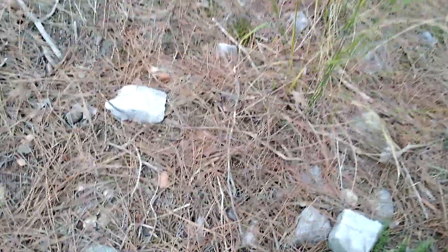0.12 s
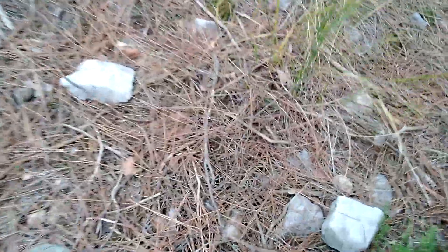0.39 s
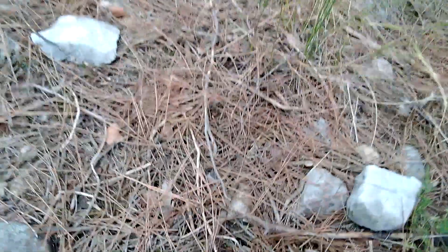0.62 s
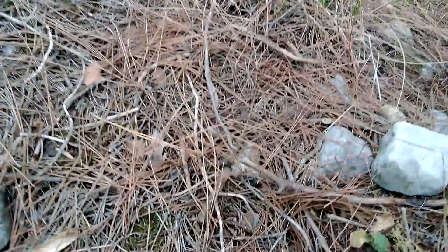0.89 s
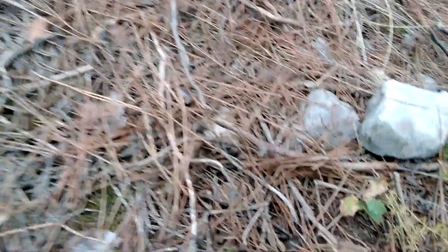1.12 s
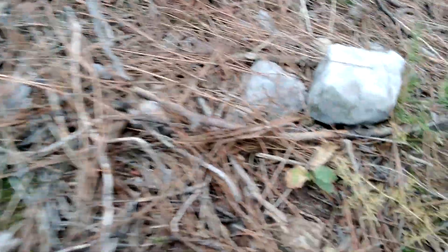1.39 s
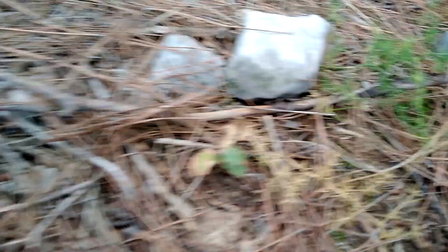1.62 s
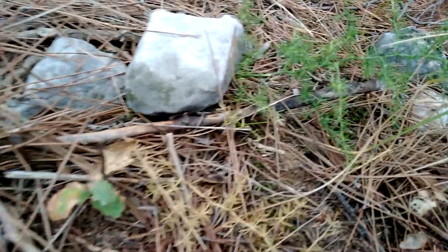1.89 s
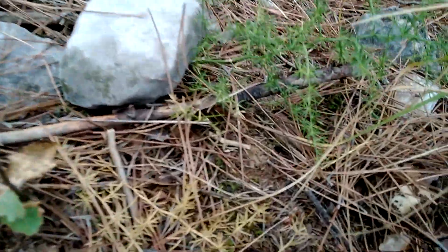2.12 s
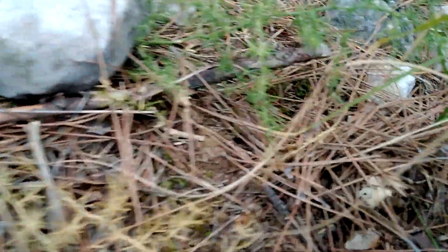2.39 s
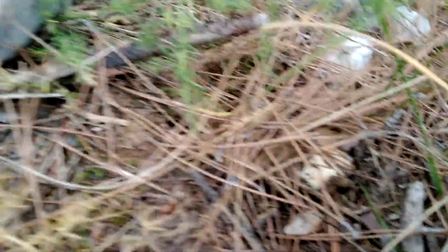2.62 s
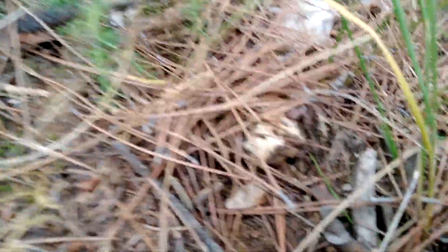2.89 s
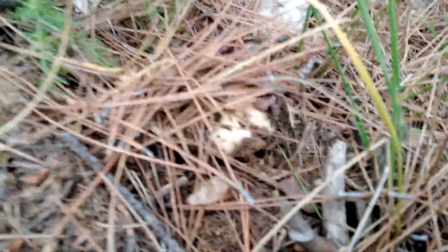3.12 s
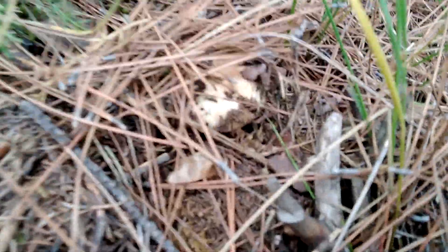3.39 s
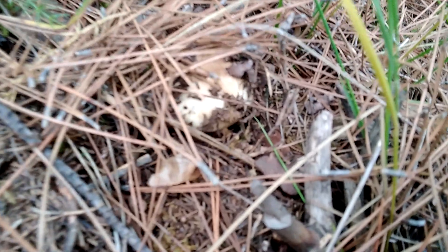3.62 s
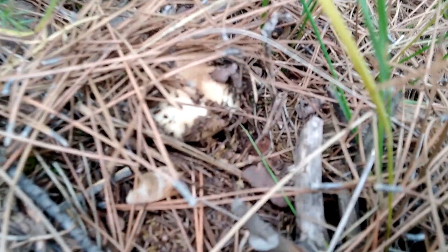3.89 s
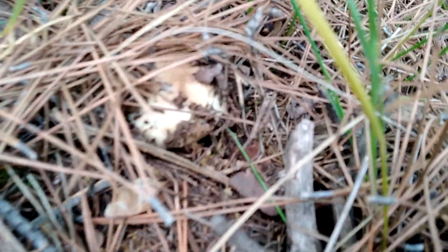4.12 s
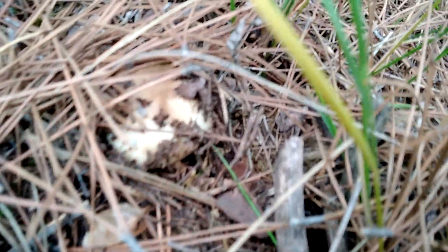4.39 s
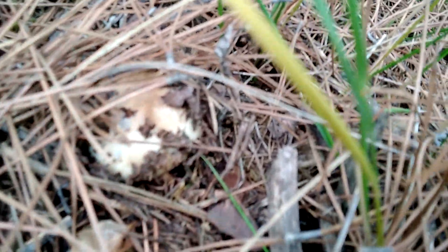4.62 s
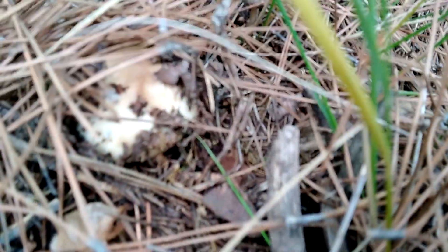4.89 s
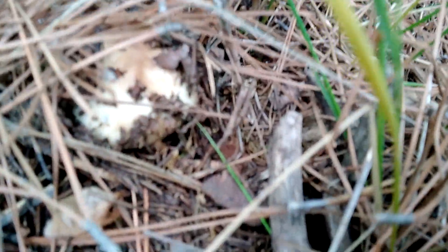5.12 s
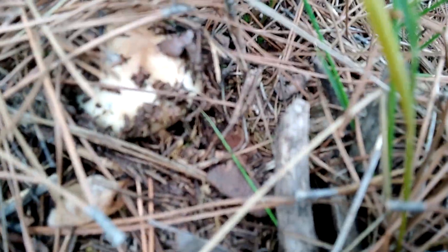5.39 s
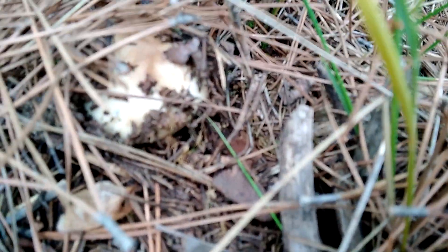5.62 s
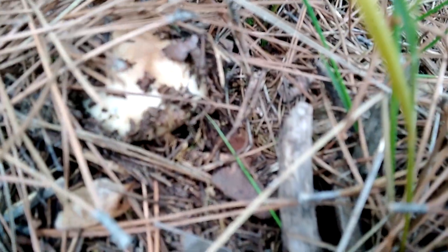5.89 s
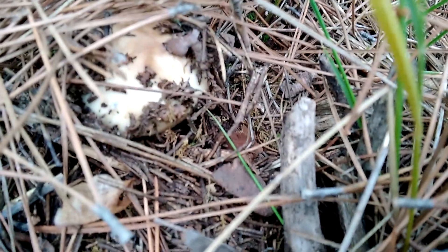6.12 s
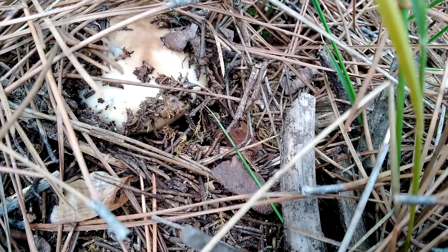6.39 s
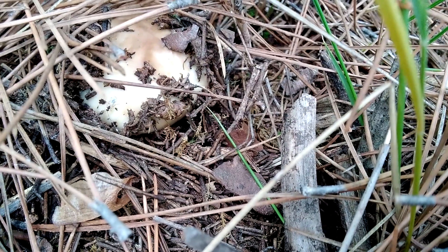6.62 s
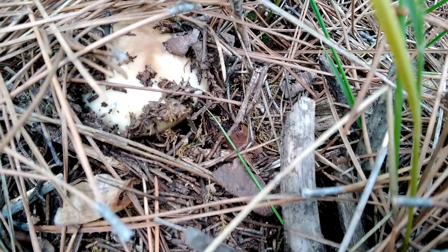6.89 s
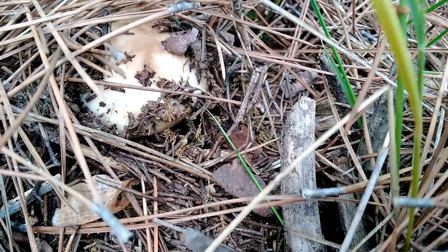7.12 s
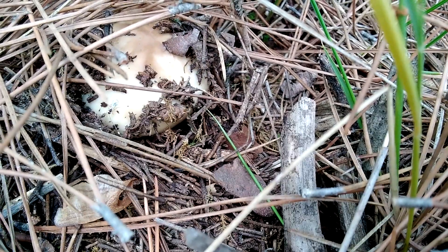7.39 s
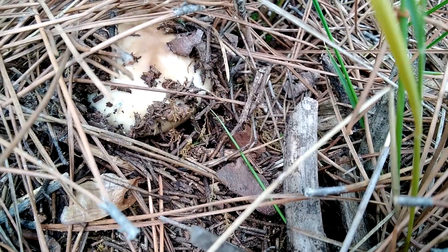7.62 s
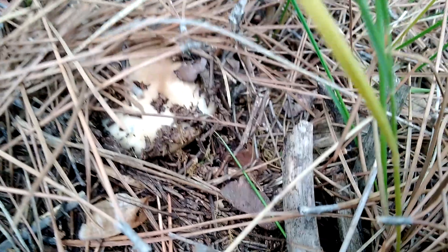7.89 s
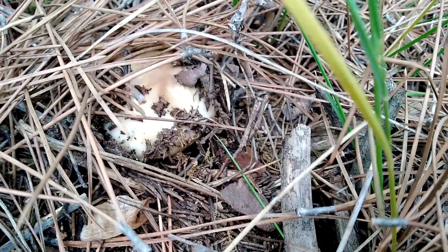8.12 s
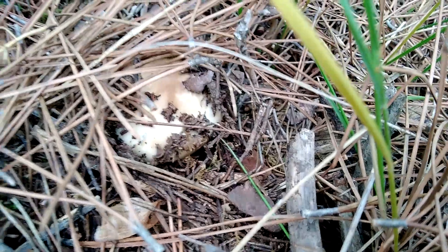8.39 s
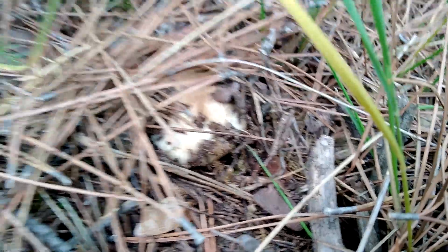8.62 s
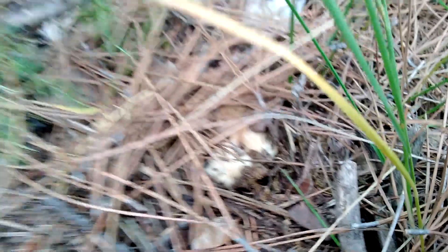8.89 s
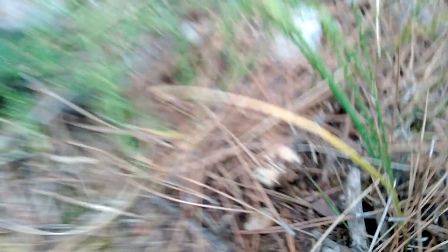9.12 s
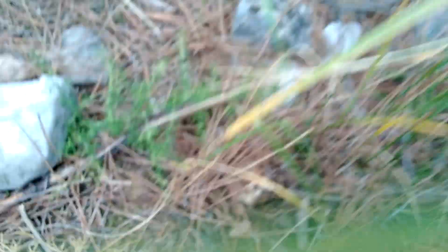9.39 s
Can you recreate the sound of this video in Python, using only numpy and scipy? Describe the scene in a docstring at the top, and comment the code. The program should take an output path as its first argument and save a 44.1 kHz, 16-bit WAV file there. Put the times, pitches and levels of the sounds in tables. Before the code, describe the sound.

Outdoors on a quiet forest floor, brittle needles and twigs crackle right beside the microphone. The first three seconds are busiest, with one very loud crunching snap and several quick crunches. Then come flurries of small dry clicks, a brief cluster of snaps, and sparse ticking over soft wind rumble. Finally the litter is brushed broadly and hisses, with a few crisp snaps.

```python
"""Dry pine needles and twigs on a forest floor, stirred close to a handheld microphone.
The needles are patchy noise that rubs in uneven clumps, with thousands of tiny ringing ticks; bunches
crunch in quick swells. Twigs snap as sharp fronts with short rings and splinter noise, a dragged stem
sings in a narrow band of noise, and weight thuds on the soil as a few low, fading cycles.
Light wind rumbles as slowly uneven low noise over a steady, far forest hush."""
import sys
import numpy as np
from scipy import signal
from scipy.fft import rfft, irfft, next_fast_len
from scipy.io import wavfile
from scipy.ndimage import uniform_filter1d, map_coordinates

SR = 44100
rng = np.random.default_rng(int(sys.argv[2]) if len(sys.argv) > 2 else 0)


def store_pcm(level_fs):
    """Save levels as 16-bit WAV."""
    pcm = np.round(np.clip(level_fs, -1, 1) * 32767).astype(np.int16)
    wavfile.write(sys.argv[1], SR, np.atleast_2d(pcm).T)


def amplitude_ratio(level_db):
    """Convert a level in decibels to the matching linear amplitude (field) ratio."""
    exponent = np.asarray(level_db, float) / 20
    return 10 ** exponent


N = 418950  # length of the scene in samples

# tone of the bright needle hiss: (frequency [Hz], relative level [dB per Hz])
NEEDLE_TONE = [(900, -10.5), (2500, -15), (4500, -8), (8000, -1.3), (11500, -4), (16000, -9)]
# tone of the duller scuff: (frequency [Hz], relative level [dB per Hz])
SCUFF_TONE = [(90, -30.5), (220, 2), (600, -4), (1300, -1.5), (4000, -8.5), (9000, -30)]


def litter():
    """Needles rub in uneven clumps and tick; the duller scuff follows the same clumps."""
    hiss_gain, scuff_gain, tick_gain = stirring()
    # a broad sweep, where single ticks drown, is also smoother
    grainy = (tick_gain / hiss_gain) ** 0.13
    clumps_db = grainy * (0.26 * wobble(17) + 1.88 * wobble(60) + 2.0 * wobble(260))
    hiss = unit(amplitude_ratio(clumps_db) * patchy(NEEDLE_TONE, patchy_db=2.0))
    scuff = unit(amplitude_ratio(0.89 * clumps_db) * patchy(SCUFF_TONE, patchy_db=3.0))
    crackle = ticks(count=2000, centre_hz=6900, octaves=0.24, spread_db=6.0)
    # ticks come in flurries
    flurries = unit(amplitude_ratio(2.2 * wobble(9)) * crackle)
    return hiss_gain * hiss + scuff_gain * scuff + tick_gain * flurries


# how much the litter is stirred:
# (time [s], needle hiss level [dB], level of the separate ticks over the hiss [dB])
STIR_CURVE = [(0, -61, -10), (.2, -50.5, -12), (.52, -64.5, -5.5), (1.2, -59.5, -1), (1.468, -58.5, -24),
              (1.58, -48.5, 2), (1.72, -54.5, -1.5), (1.95, -64, -5), (2.25, -63.5, -17.5),
              (2.36, -51, -10), (3.0, -50, -0.5), (3.3, -61, 3), (4.05, -57.5, 3), (4.3, -65, -1),
              (5.35, -65.5, 8.5), (5.8, -73.5, 7.5), (6.9, -74.5, 1), (8.3, -73, 9.5), (8.66, -64, 1.5),
              (8.75, -51.5, 0), (8.97, -42, -12), (9.27, -47, -18), (9.4, -42.5, -21)]
# bunches of needles crushed at once:
# (middle [s], hiss level [dB], length scale of the swell [s], scuff level over the hiss [dB])
CRUNCH_LIST = [(0.102, -49.5, 0.062, -19), (1.026, -53, 0.087, -3.5), (1.082, -41.5, 0.02, -34),
               (1.32, -49.5, 0.022, -30), (1.526, -20.5, 0.017, -22), (1.654, -41, 0.026, -7),
               (1.684, -30, 0.01, -15), (1.848, -31.5, 0.013, -16), (1.884, -42.5, 0.058, -10),
               (2.014, -40.5, 0.069, -53), (2.176, -37, 0.044, -34), (2.189, -47.5, 0.019, 6.5),
               (2.29, -48.5, 0.038, -11), (2.74, -36.5, 0.01, -38), (2.903, -33.5, 0.021, -14),
               (3.208, -44.5, 0.075, -21), (4.803, -46, 0.028, -7), (4.854, -50, 0.01, -9.5),
               (5.462, -43.5, 0.031, -4), (6.267, -48.5, 0.016, -30), (6.658, -54, 0.02, -15),
               (7.854, -55.5, 0.053, 1), (8.809, -46, 0.011, -10), (8.845, -44, 0.0099, -14),
               (9.07, -35, 0.09, -17), (9.161, -34, 0.063, -0.3), (9.193, -33, 0.016, 1),
               (9.355, -47.5, 0.056, 0.5)]
# the scuff follows the slow hiss with a narrower swing:
# its level at a hiss of -60 dB [dB], and its change per dB of hiss [dB]
SCUFF_DB, SCUFF_FOLLOWS = -62.5, 0.5
# a crunch builds more slowly than it settles: rise and fall as shares of its length scale
CRUNCH_RISE, CRUNCH_FALL = 0.36, 0.26
CRUNCH_TAIL = 0.91  # shape of the fall, as a power
DEEPER_TICKS = 0.43  # dB more ticks per dB of scuff: a deeper press breaks more needles


def stirring():
    """Gains of hiss, scuff and ticks: powers of the slow stir and of a quick swell per crunch add up."""
    t = np.arange(N) / SR
    s, hiss_points, tick_points = np.transpose(STIR_CURVE)
    hiss_db = np.interp(t, s, hiss_points)
    tick_db = hiss_db + np.interp(t, s, tick_points)
    scuff_db = SCUFF_DB + SCUFF_FOLLOWS * (hiss_db + 60)
    hiss, scuff, tick = amplitude_ratio([hiss_db, scuff_db, tick_db]) ** 2
    for middle, db, length, low_db in CRUNCH_LIST:
        near = slice(max(0, round((middle - 0.3) * SR)), round((middle + 0.3) * SR))
        late = (t[near] - middle) / length
        rise = (late / CRUNCH_RISE) ** 2
        fall = (np.abs(late) / CRUNCH_FALL) ** CRUNCH_TAIL
        swell = np.exp(-np.where(late < 0, rise, fall))
        hiss[near] += amplitude_ratio(db) ** 2 * swell
        scuff[near] += amplitude_ratio(db + low_db) ** 2 * swell
        tick[near] += amplitude_ratio(db + DEEPER_TICKS * low_db) ** 2 * swell
    return np.sqrt([hiss, scuff, tick])


def ticks(count, centre_hz, octaves, spread_db):
    """Needles breaking at random moments: many faint, a few strong, each with its own pitch."""
    when, size, turn = rng.random((count, 3)).T
    hz = centre_hz * 2 ** (octaves * rng.standard_t(3, count))
    hz = np.clip(hz, 1500, 14000)[:, None]
    # either polarity, at most 13 dB above the faintest
    strength = np.sign(turn - 0.5) * amplitude_ratio(np.minimum(-spread_db * np.log(1 - size), 13))
    shapes = breaks(hz, sharp=0.9, t60=0.0022, woody_db=-18.5)
    return unit(laid(when * N / SR, strength[:, None] * shapes))


def patchy(spectrum, patchy_db):
    """Coloured noise whose gain varies in patches of pitch and time."""
    z = signal.stft(rng.standard_normal(N), nperseg=512)[2]
    field = uniform_filter1d(rng.standard_normal(z.shape), size=14, axis=0)  # smooth over pitch
    field = uniform_filter1d(field, size=12, axis=1)  # smooth over time
    noise = signal.istft(z * amplitude_ratio(patchy_db * unit(field)), nperseg=512)[1][:N]
    return coloured(noise, spectrum)


def breaks(hz, sharp, t60, woody_db):
    """Breaking stems: a sharp front, a brief ring with a lower mode, a woody body and splinters."""
    t = np.arange(900) / SR
    draw = rng.standard_normal((len(hz), len(t) + 2))
    # fibres give way one after another, so ring and spray take a moment to build
    rise = 1 - np.exp(-t / 0.00027)
    # thick, low stems break duller
    bright = np.minimum(hz / 6500, 1) ** 0.21
    front = bright * sharp * ring(t, 8200, 0.0008)
    modes = (1.06 * ring(t, hz, t60) + 0.43 * ring(t, 0.396 * hz, t60)) * rise
    body_hz = 1100 * 2 ** (0.55 * draw[:, 1:2])
    body = amplitude_ratio(woody_db + 1.24 * draw[:, :1]) * ring(t, body_hz, 0.016)
    # splinters are strongest in the middle treble
    treble = signal.butter(1, [2500, 10000], "band", fs=SR, output="sos")
    spray = signal.sosfilt(treble, draw[:, 2:])
    # they fade fast at first, then linger faintly
    fade = amplitude_ratio(-5.5 - 60 * t / 0.005) + amplitude_ratio(-19.0 - 60 * t / 0.031)
    return front + modes + body + bright * spray * rise * fade


# single twig breaks: (time [s], level [dB], pitch of the main ring [Hz])
SNAP_LIST = [(0.099, -33, 8800), (1.0426, -29.5, 6900), (1.0741, -26.5, 9000), (1.5278, -8, 9200),
             (1.5908, -30, 5300), (1.686, -13.5, 7040), (1.832, -26, 8900), (1.847, -19.5, 7840),
             (1.913, -25, 8300), (2.5299, -14, 7200), (2.7106, -25, 7540), (2.7783, -22.5, 9050),
             (2.82, -29.5, 8540), (3.0083, -29, 12300), (3.2856, -19, 3280), (3.365, -28.5, 8650),
             (3.391, -20.5, 6400), (3.499, -33, 6760), (3.5206, -23.5, 7300), (3.648, -25.5, 7300),
             (3.7644, -22, 6900), (3.832, -27.5, 7200), (3.8788, -23.5, 6900), (3.929, -16.5, 6900),
             (3.9486, -22, 5040), (3.9545, -22.5, 6700), (3.979, -32, 6840), (4.027, -20.5, 6730),
             (4.064, -29, 7100), (4.126, -24, 6900), (4.141, -33, 7200), (4.1632, -30.5, 6900),
             (4.186, -29, 6900), (4.283, -23, 6800), (4.4187, -30, 14300), (4.5473, -38, 7000),
             (4.7598, -23.5, 6700), (4.7645, -31, 5800), (4.961, -41, 6700), (5.0518, -20.5, 4200),
             (5.1047, -34, 5300), (5.2057, -13.5, 7400), (5.2071, -15, 6900), (5.2209, -21, 4850),
             (5.2509, -20, 6270), (5.2776, -32, 5100), (5.329, -36, 7950), (5.3661, -37, 8200),
             (5.4474, -17, 5200), (5.452, -19, 6960), (5.463, -18, 6800), (5.515, -20, 5570),
             (5.7422, -22.5, 5740), (6.0286, -21, 2080), (6.0893, -38, 8600), (6.344, -33.5, 6500),
             (7.3, -33, 9860), (7.578, -35, 6050), (7.631, -31.5, 6600), (7.8632, -26.5, 7700),
             (7.917, -23.5, 6600), (8.077, -31, 6900), (8.0978, -37, 7700), (8.206, -32, 6060),
             (8.2812, -49, 10000), (8.3594, -22.5, 7600), (8.4005, -29.5, 6600), (8.4205, -26, 5750),
             (8.4482, -27.5, 7450), (8.4508, -27, 2100), (8.4702, -29, 1470), (8.484, -33, 8400),
             (8.5106, -30, 1440), (8.55, -31, 1520), (8.6294, -29.5, 4800), (8.864, -27.5, 8100),
             (9.188, -19, 7540), (9.2002, -17, 6240), (9.36, -16.5, 9000), (9.3619, -15.5, 6200),
             (9.4854, -21, 8400)]


def snaps():
    """The breaks that stand out; the harder the break, the sharper its front."""
    s, db, hz = np.transpose(SNAP_LIST)[:, :, None]
    sharp = np.clip((db + 30.5) / 9, 0.55, 2.3)
    return laid(s[:, 0], amplitude_ratio(db) * breaks(hz, sharp, t60=0.003, woody_db=-19.5))


# a stem dragged along, singing in one band:
# (middle [s], level before grain and stroke [dB], length scale of the stroke [s], pitch [Hz])
SCRAPE_LIST = [(1.022, -54, 0.035, 2660), (3.495, -70.5, 0.47, 1220), (9.39, -52, 0.073, 4350)]


def scrapes():
    """Grainy noise in one resonance, swelling and fading under a smooth stroke."""
    t, out = np.arange(N) / SR, 0
    for middle, db, length, hz in SCRAPE_LIST:
        band = coloured(rng.standard_normal(N), [(hz / 1.7, -30), (hz, 0), (hz * 1.1, -30)])
        grain = amplitude_ratio(db + 4.3 * wobble(200))
        stroke = np.exp(-((t - middle) / length) ** 2)
        out = out + grain * stroke * band
    return out


# low knocks on soil and thicker wood: (time [s], level [dB], pitch [Hz])
THUD_LIST = [(.068, -28, 480), (.266, -27.5, 494), (1.204, -22.5, 920), (1.373, -40, 1310),
             (2.186, -24, 114), (2.531, -17.5, 85.5), (2.2, -27, 440), (3.284, -27.5, 254),
             (3.391, -31.5, 503), (3.929, -29, 463), (5.206, -22, 730), (7.917, -32, 1370),
             (9.199, -32, 156), (9.36, -27, 63)]


def thuds():
    """Soft contacts: a few low cycles with a rounded start and a shorter, higher edge."""
    s, db, hz = np.transpose(THUD_LIST)[:, :, None]
    t = np.arange(4000) / SR
    low = ring(t, hz, 1.4 / hz + 0.0088)
    edge = 0.47 * ring(t, 900 + 1.34 * hz, 0.0045)
    rounded = 1 - np.exp(-t / 0.00039)
    return laid(s[:, 0], amplitude_ratio(db) * (low + edge) * rounded)


# tone of the wind and far hush: (frequency [Hz], relative level [dB per Hz])
HUSH_TONE = [(25, -2), (58, 1.8), (120, -8.5), (220, -12.5), (450, -26), (900, -30.5), (2400, -44),
             (16000, -44)]


def forest():
    """Wind rumble, the noise below about 300 Hz, gently uneven over a steady far hush."""
    air = coloured(rng.standard_normal(N), HUSH_TONE)
    rumble = signal.sosfiltfilt(signal.butter(2, 300, fs=SR, output="sos"), air)
    gusts = amplitude_ratio(0.6 * wobble(1.28) + 0.77 * wobble(11.0))
    # the steady rumble is already in the air, so only its change is added
    return amplitude_ratio(-52) * (air + rumble * (gusts - 1))


def unit(x):
    """Scaled to an rms (average strength) of 1."""
    return x / np.sqrt(np.mean(x ** 2) + 1e-20)


def wobble(rate):
    """A smooth random curve through rate random points a second."""
    points = rng.standard_normal(int(N * rate / SR) + 4)
    return map_coordinates(points, [np.arange(N) * rate / SR])


def coloured(x, spectrum):
    """x filtered through (frequency [Hz], gain [dB]) points on a log axis, then scaled to rms 1."""
    size = next_fast_len(N + 8192)
    hz, db = np.transpose(spectrum)
    log_hz = np.log(np.fft.rfftfreq(size, 1 / SR) + 1)
    gain = amplitude_ratio(np.interp(log_hz, np.log(hz), db))
    return unit(irfft(rfft(x, size) * gain, size)[:N])


def ring(t, hz, t60):
    """A damped sine that falls by 60 dB in t60 seconds."""
    return np.sin(2 * np.pi * hz * t) * amplitude_ratio(-60 * t / t60)


def laid(times, shapes):
    """Sum of short shapes, each starting at its own time in seconds."""
    starts = np.round(np.asarray(times) * SR).astype(int)
    at = starts[:, None] + np.arange(shapes.shape[1])
    return np.bincount(at.ravel(), shapes.ravel(), N + SR)[:N]


def scene():
    """All sources added together, in one channel."""
    return (litter() + snaps() + scrapes() + thuds() + forest())[None]


def top_cut(x):
    """Nothing passes above the cut-off."""
    return signal.sosfilt(signal.butter(12, 17000, fs=SR, output="sos"), x)


def record(dry):
    """The microphone path ends steeply at the top: a sharp low-pass at 15.8 kHz."""
    low_pass = signal.ellip(10, 0.5, 38, 15800, fs=SR, output="sos")
    mix = signal.sosfilt(low_pass, dry)
    return top_cut(mix)


dry = scene()
out = record(dry)
store_pcm(out)
```